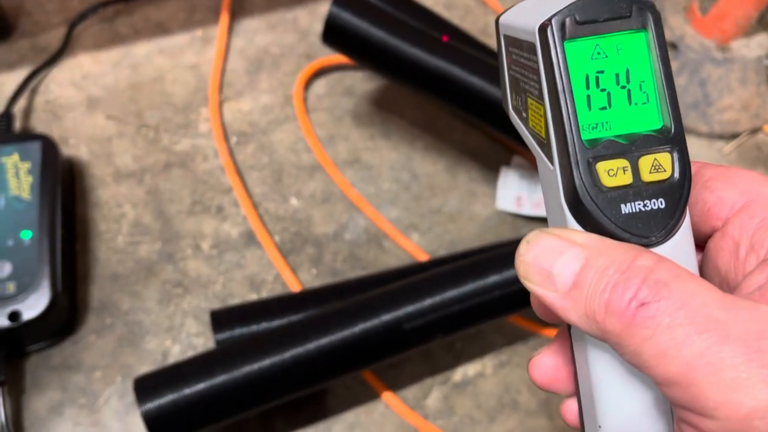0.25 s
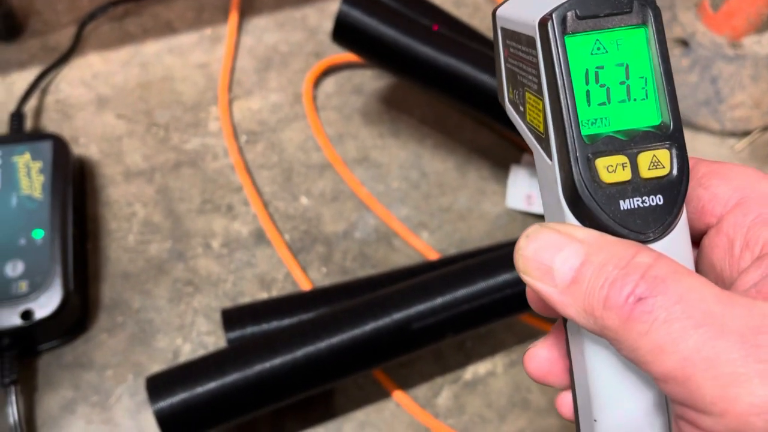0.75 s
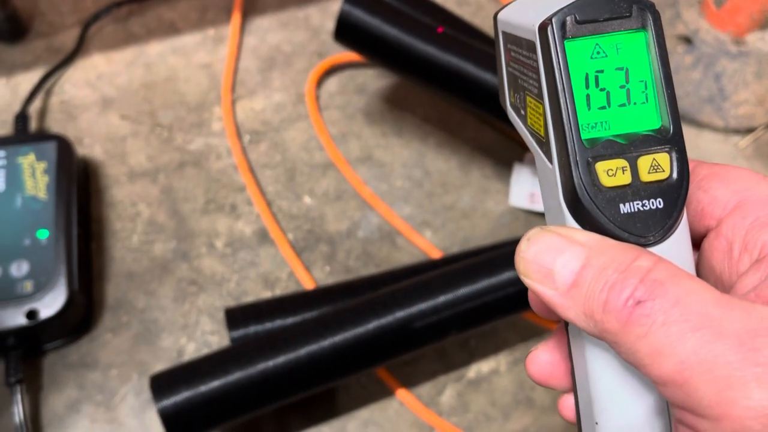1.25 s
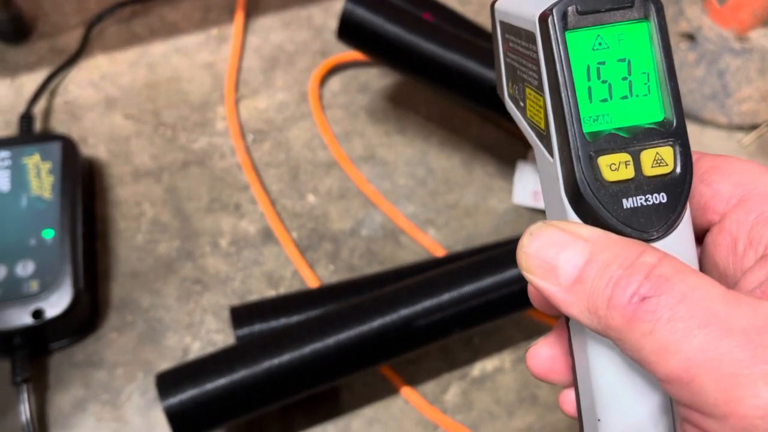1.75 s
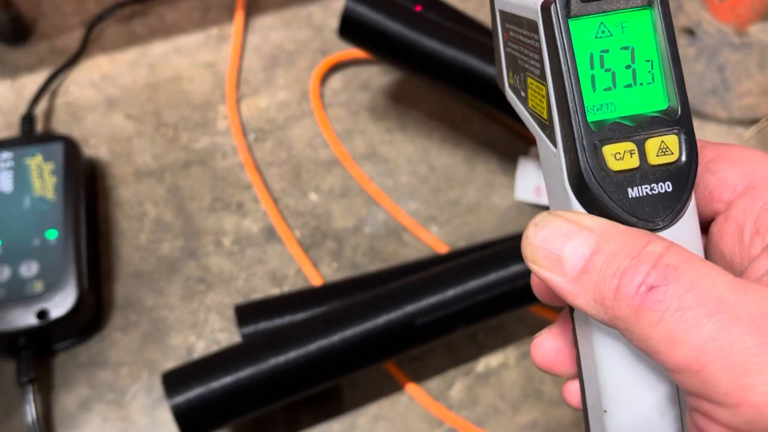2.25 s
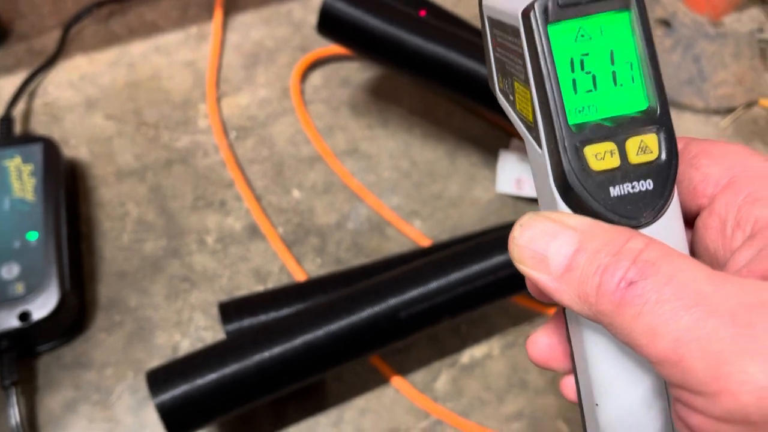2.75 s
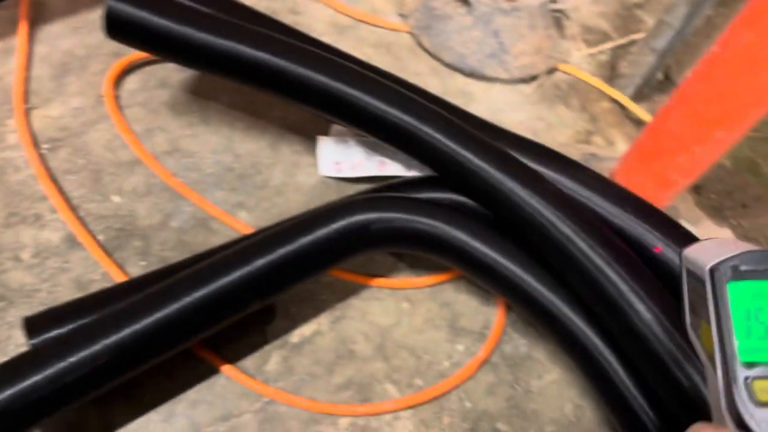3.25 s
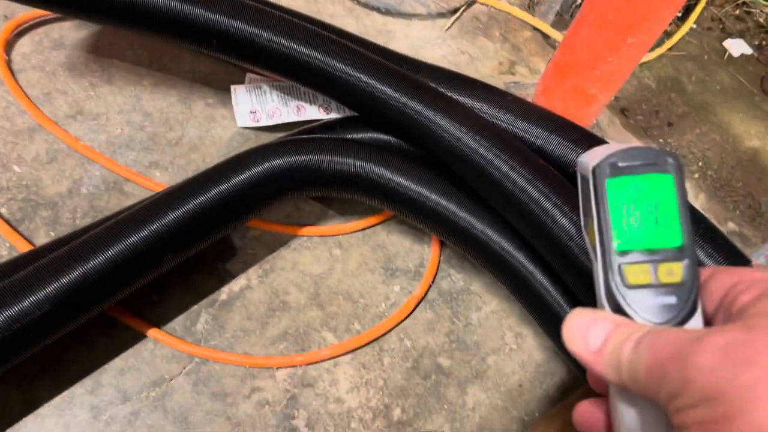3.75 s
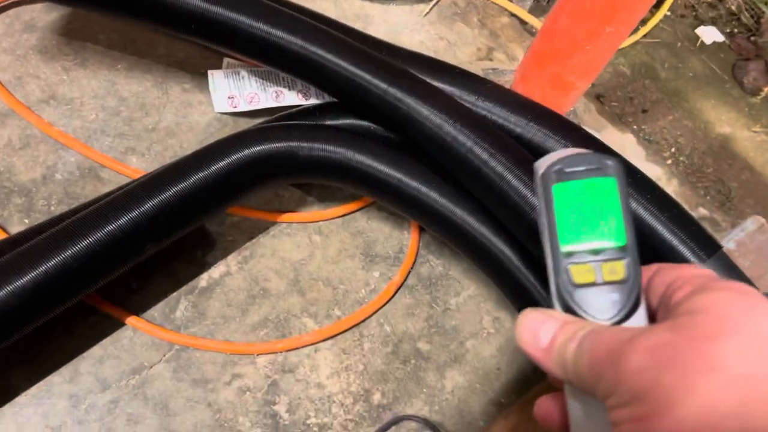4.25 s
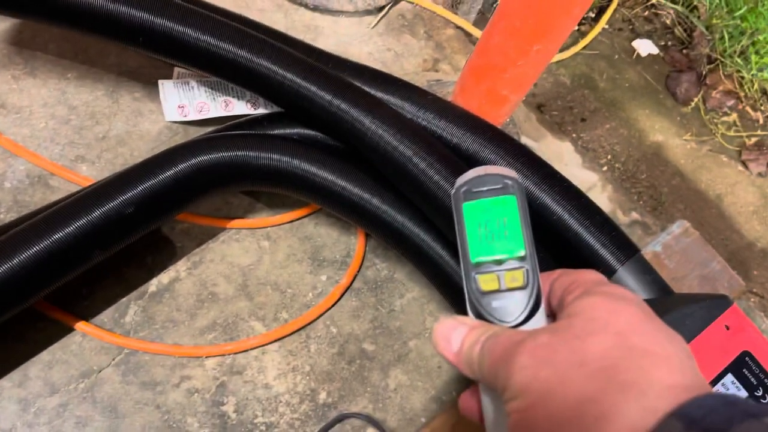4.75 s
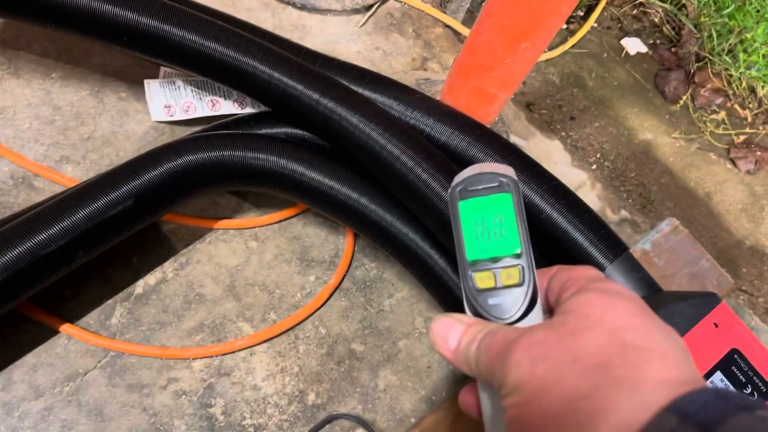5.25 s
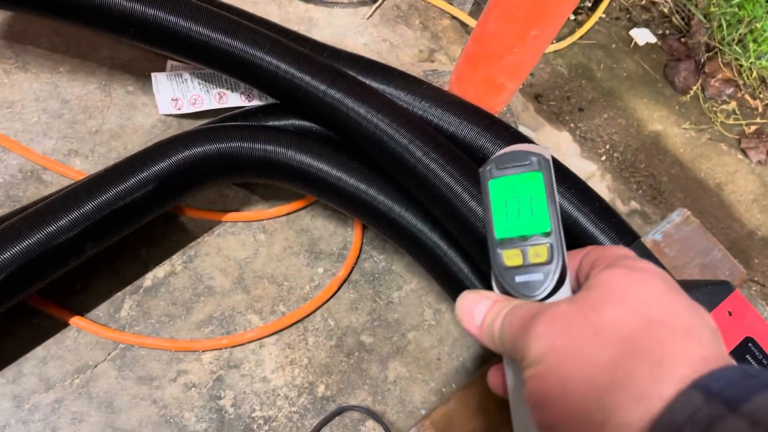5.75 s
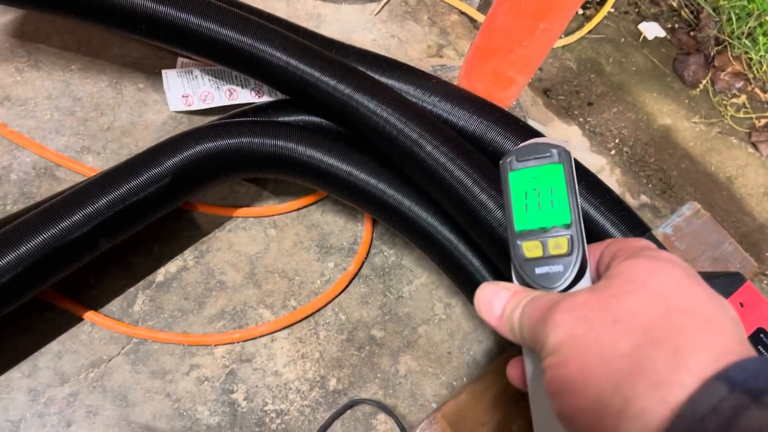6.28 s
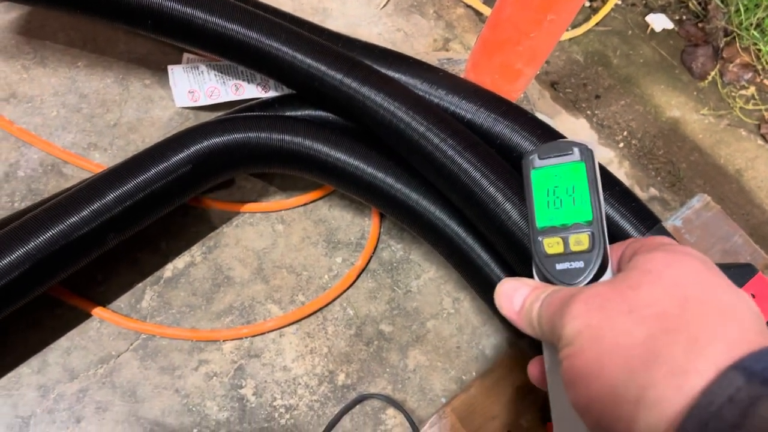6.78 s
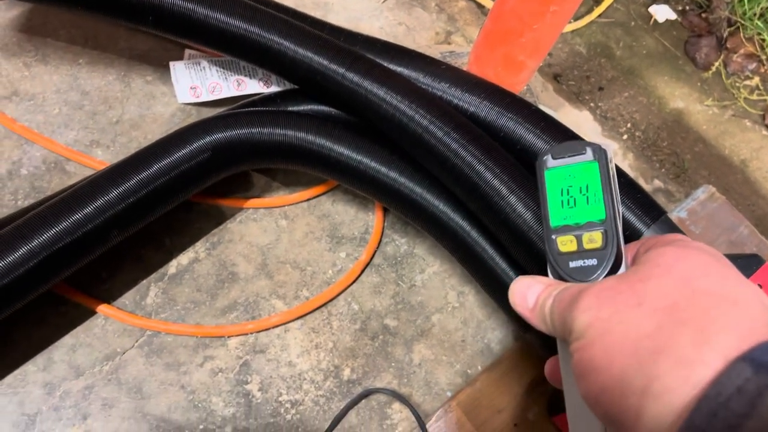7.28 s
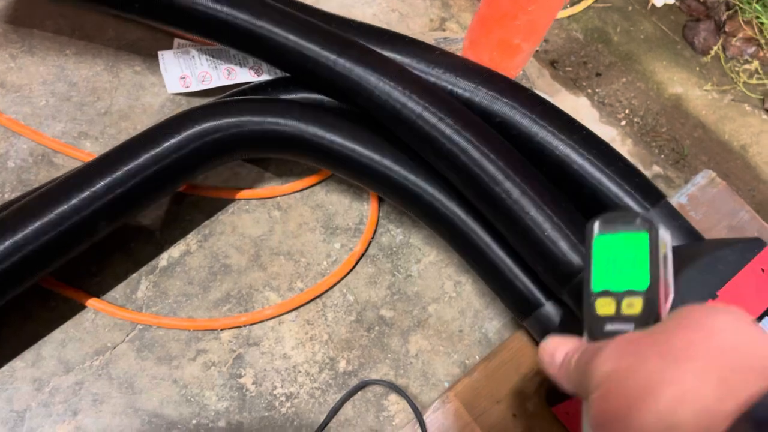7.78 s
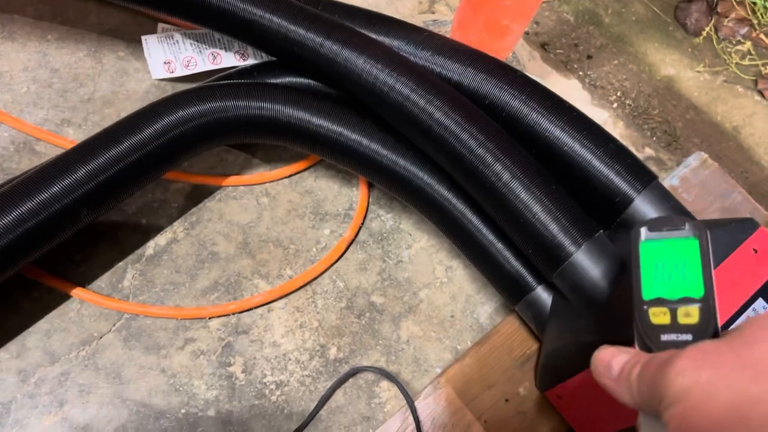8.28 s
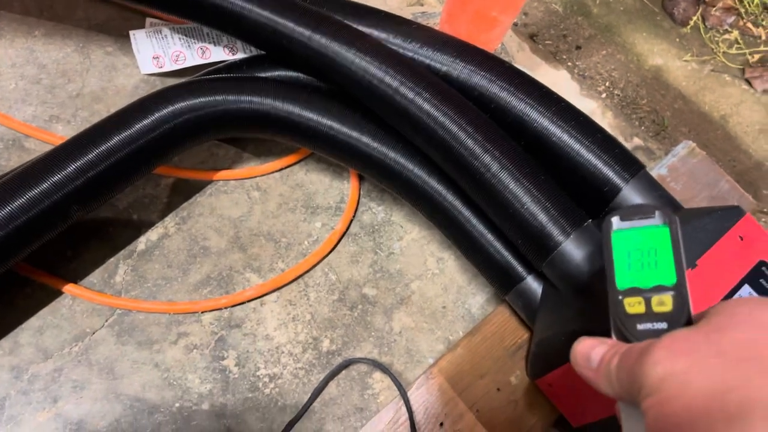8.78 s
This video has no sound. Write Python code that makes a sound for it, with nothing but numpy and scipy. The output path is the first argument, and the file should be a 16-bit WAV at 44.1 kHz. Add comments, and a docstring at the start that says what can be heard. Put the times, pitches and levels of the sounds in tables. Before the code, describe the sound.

Steady low blower roar and wavering whine from a small burner heater, growing slightly louder, with faint quick ticking and a single trigger click.

```python
"""On a garage floor a small diesel air heater runs; a hand-held phone turns from the hose ends
towards it and leans in. Flame and blower turbulence, modelled as noise exciting resonances, rings
the burner, housing and hoses as roar, whine and hiss. Damped modes give the faint ticks of the
fuel pump and the single click of a plastic thermometer's trigger. Two ports give the stereo image."""
import sys
import numpy as np
from scipy import signal
from scipy.fft import rfft, irfft, next_fast_len
from scipy.io import wavfile
from scipy.ndimage import uniform_filter1d

SR = 44100
rng = np.random.default_rng(int(sys.argv[2]) if len(sys.argv) > 2 else 0)


def pcm_store(signal):
    """Save signal as 16-bit PCM."""
    levels = np.round(np.clip(np.atleast_2d(signal), -1, 1) * 32767)
    wavfile.write(sys.argv[1], SR, levels.astype(np.int16).T)


N = 397782
TIME, SIZE = np.arange(N) / SR, next_fast_len(N)
HZ = np.maximum(np.arange(SIZE // 2 + 1) * SR / SIZE, 1)


def undb(db):
    """Decibel law: the amplitude ratio of a level in dB."""
    return 10 ** (np.asarray(db) / 20)


def over_hz(points_hz, values):
    """Log-frequency interpolation: straight lines between points on a logarithmic axis."""
    return np.interp(np.log(HZ), np.log(points_hz), values)


def walk(rate):
    """Smoothed random process: random levels held 1 / rate s, averaged twice, standard deviation 1."""
    hold = int(SR / rate)
    steps = np.repeat(rng.standard_normal(N // hold + 1), hold)
    steps = uniform_filter1d(uniform_filter1d(steps, hold), hold)[:N]
    return steps / steps.std()


# Path of the phone: time_s, spot (0 hose ends, 1 along the hoses, 2 near the heater),
# nearness_db (level rise from coming nearer, before each layer takes its share)
PHONE_PATH = [(0, 0.091, -0.5), (2.7, 0, 0), (3.1, 0.81, 1), (5.0, 0.99, 2), (6.8, 1.03, 2.5),
              (7.2, 1.21, 3), (8.2, 1.52, 2), (8.5, 1.94, 3.5), (9.02, 2.07, 3)]


def phone_path():
    """Moving receiver: its spot and the nearness level in dB at every sample."""
    time_s, spot, nearer_db = np.transpose(PHONE_PATH)
    return np.interp(TIME, time_s, spot), np.interp(TIME, time_s, nearer_db)


# Levels of roar, whine and hiss: level_db, nearness_share (factor), turn_db (step on turning
# towards the heater), lean_db (step on leaning in)
LAYER_LEVELS = [(-28.5, 1.12, -0.1, -0.15), (-31, 0.62, 2, 1.6), (-40, 0.064, -0.57, 1.45)]
# Slow wavering of roar, whine and hiss: depth_db (standard deviation), rate_per_s
LAYER_WAVER = [(.5, 6), (.6, 5), (.3, 6)]


def layer_gain(layer):
    """Distance and directivity: level follows the phone's approach, turn and lean, with a random waver."""
    level_db, share, turn_db, lean_db = LAYER_LEVELS[layer]
    depth_db, rate_per_s = LAYER_WAVER[layer]
    spot, nearer_db = phone_path()
    turned, leaned = np.clip(spot, 0, 1), np.clip(spot - 1, 0, 1)
    position_db = share * nearer_db + turn_db * turned + lean_db * leaned
    return undb(level_db + position_db + depth_db * walk(rate_per_s))


# Phase between the ports: frequency_hz, left_lead_rad. The bass reaches the right port first,
# the phase swings across the whine, and at the top it turns through a whole cycle.
PORT_LEAD = [(40, -.08), (110, -.14), (200, -.27), (660, -.85), (900, -.25), (1110, -.25), (1380, -1.8),
             (1700, -2.4), (1950, .7), (7700, .55), (8400, 0), (8800, 0), (9750, -2.8), (10230, -np.pi),
             (10550, -3.5), (11800, -2 * np.pi)]
# Likeness and balance of the ports: frequency_hz, likeness (0-1), left_minus_right_db.
# Turned away from the heater, facing it, and the top band that both share
PORTS_AWAY = [(40, .97, -1.1), (110, .988, -1.8), (200, .96, -1.9), (340, .75, -1), (440, .3, -2.5),
              (680, .7, -.4), (850, .25, 3.2), (1100, .7, -2.1), (1380, .93, 4), (1650, .3, 3),
              (1950, .5, 5.5), (2700, .72, 3.5), (3650, .85, 1.5), (4500, .45, 6.5), (7700, .68, 1.8)]
PORTS_FACING = [(40, .97, -1), (110, .988, -1.5), (200, .975, -1.3), (340, .9, -1.5), (600, .76, -2.8),
                (770, .25, 3.5), (950, .35, -2.1), (1120, .93, .1), (1380, .88, 6), (1750, .22, 4.5),
                (1950, .6, -1.5), (2350, .72, 3.8), (3500, .8, 1.8), (4800, .78, 4.5), (5400, .45, 2.5),
                (7700, .75, 2.1)]
PORTS_TOP = [(8450, .99, 0), (8800, .99, 0), (9750, .98, 0), (10230, .998, 0), (11350, .96, 0),
             (11700, .998, 0)]


def ports(table):
    """Interaural-style cues: likeness of two ports and their complex gains, from level and phase."""
    hz, alike, pan_db = np.transpose(table + PORTS_TOP)
    half = undb(over_hz(hz, pan_db) / 2)
    lead_rad = over_hz(*np.transpose(PORT_LEAD))
    return np.clip(over_hz(hz, alike), 0, 1), np.array([half, np.exp(-1j * lead_rad) / half])


def turbulence(modes, spots, steep, between=0):
    """Noise-excited resonance: peaks (plus power between them), mono rms 1 per spot, crossfaded on the path."""
    direct, left, right = (rfft(row, SIZE) for row in rng.standard_normal((3, N)))
    spot, _ = phone_path()
    # power response of each mode; the exponent steepens its skirts
    shapes = np.array([(1 + (2 * (HZ - mode[0]) / mode[1]) ** 2) ** -steep for mode in modes])
    away, facing = ports(PORTS_AWAY), ports(PORTS_FACING)
    out = 0
    for at, only, levels_db in zip(spots, np.eye(len(spots)), np.transpose(modes)[2:]):
        power = between + undb(2 * levels_db) @ shapes
        alike, gains = facing if at else away
        # the direct sound is shared, the garage's diffuse sound differs at each port
        diffuse = np.array([left, right])
        spectrum = gains * (np.sqrt(alike) * direct + np.sqrt(1 - alike) * diffuse)
        heard = irfft(np.sqrt(power) * spectrum, SIZE)[:, :N]
        heard = heard / heard.mean(axis=0).std()
        out = out + np.interp(spot, spots, only) * heard
    return out


ROAR_SPOTS = (0, 1, 2)
# Low resonances: frequency_hz, width_hz, then level_db at each of ROAR_SPOTS (relative)
ROAR_MODES = [(66.6, 15.6, -5.5, -12, -1.5), (97.3, 31.4, 1, 2.5, -0.5), (117.5, 30, -5.5, -9.5, -3.5),
              (156.7, 32, -8.5, -7.5, -4.5), (197.4, 28.7, -4, -5, -2.5), (224, 26, -9.5, -10.5, -6.5),
              (254, 41, -10, -11, -8.5), (279.2, 16, -8.5, -8.5, -1), (310, 32, -12.5, -14.5, -1),
              (348, 86, -17.5, -14, -11.5), (445, 54, -25, -39, -28), (489, 37, -16.5, -14, -9.5),
              (559, 84, -15.5, -15, -12), (600.3, 30, -8.5, -15, -13.5), (634, 28, -11, -15, -6.5),
              (667, 70, -21, -20.5, -9.5), (725, 33, -14, -16, -17), (784, 61, -17, -21.5, -24),
              (825, 43, -17, -19.5, -19.5), (916, 78, -22, -21.5, -18.5), (1030, 76, -21.5, -21, -17.5)]


def roar():
    """Broadband excitation of low resonances: turbulence as a roar."""
    return turbulence(ROAR_MODES, ROAR_SPOTS, steep=1.59) * layer_gain(0)


# whine and hiss are also given part of the way in, as their peaks climb
FINE_SPOTS = (0, 1, 1.4, 2)
# Duct resonances and their neighbours: frequency_hz, width_hz, then level_db at each of FINE_SPOTS (relative)
WHINE_MODES = [(1116, 11, -17.5, -14, -15, -17), (1167, 35.5, -5.5, -2, -7.5, -9.5),
               (1199.3, 20.5, -5.5, -4.5, 3.5, 0), (1208.7, 23, -2.5, -5.5, -8, -2.5),
               (1240, 25, -25, -8.5, -7, -4.5), (1261, 11.5, -5.5, -12, -9, -12),
               (1280, 44, -9, -10.5, -9.5, -7), (1303, 18, -9, -9.5, -10, -10), (1320.3, 20, 0, 1, -6, -9),
               (1333, 19, -6, -4.5, -5, -7), (1358.5, 35, -7.5, -9.5, -4, -1),
               (1388, 24, -14, -13, -8, -3.5), (1442, 50, -15, -33, -24, -16),
               (1470, 40, -13, -21.5, -20, -17), (1554, 82, -21, -22.5, -22, -23)]


def whine():
    """Duct resonance: narrow, closely spaced peaks draw a whine out of the turbulence."""
    return turbulence(WHINE_MODES, FINE_SPOTS, steep=1.58) * layer_gain(1)


# High resonances: frequency_hz, width_hz, then level_db at each of FINE_SPOTS (relative)
HISS_MODES = [(1903, 72, 0, 2.5, 1.5, -1), (1970, 71, 0.5, -3, 0, 3), (2040, 86, -4, -4, -6, -6),
              (2165, 70, -9, -5, -12, -16), (2245, 85, -6, -6.5, 0, -2), (2352, 69, -10, -2.5, -5.5, -3.5),
              (2465, 77, -7, -8, -11, -13), (2606, 87, -6.5, -6, -6.5, -6), (2754, 115, -1.5, -5, -5, -6),
              (3072, 140, -5.5, -8, -8, -7.5), (3325, 240, -11, -9, -8.5, -11),
              (3525, 92, -12, -7, -10, -13), (3637, 77, 0.5, -10.5, -14, -19),
              (3700, 50, -6, -16, -16, -17), (3870, 204, -10, -8.5, -8, -8.5),
              (4150, 90, -25, -12, -11, -11), (4480, 120, -17, -15, -14, -12),
              (4840, 220, -40, -14.5, -15, -17), (5230, 160, -20, -23, -20, -20),
              (5740, 160, -29, -19.5, -22, -24), (6210, 160, -22, -23, -22, -20),
              (7650, 200, -27, -26, -28, -32), (7860, 150, -19.5, -24, -27, -32),
              (8230, 120, -24, -28, -30, -30)]
# Broad air noise between them: frequency_hz, density_db (per Hz, on the scale of HISS_MODES)
AIR_NOISE = [(1000, -27), (1500, -10), (1700, -5.5), (2500, -17.5), (4000, -16.5), (5200, -23.5),
             (6600, -25), (7800, -24), (8600, -25), (9800, -23), (10700, -21.5), (11200, -23.5),
             (11700, -32), (11950, -50), (12300, -85)]


def hiss():
    """Broadband flow noise: high resonances stand on a continuous spectrum of air noise."""
    air_power = undb(2 * over_hz(*np.transpose(AIR_NOISE)))
    return turbulence(HISS_MODES, FINE_SPOTS, steep=1.61, between=air_power) * layer_gain(2)


def clicks(events, ring, spread, rise_s, table):
    """Impulse response of damped modes: short knocks, detuned at random by spread, through both ports."""
    t, out = np.arange(SR // 10) / SR, np.zeros(SIZE + SR)
    chance = rng.standard_normal((len(events), len(ring)))
    for (start_s, level_db), draws in zip(events, chance):
        knock = np.zeros(len(t))
        for (hz, mode_db, t60_s), draw in zip(ring, draws):
            tone = np.sin(2 * np.pi * hz * (1 + spread * draw) * t)
            knock += undb(mode_db) * tone * np.exp(-np.log(1000) * t / t60_s)
        knock = knock * (1 - np.exp(-(t / rise_s) ** 2))  # the contact builds up over a moment
        first = int(start_s * SR)
        out[first:first + len(t)] += undb(level_db) * knock / abs(knock).max()
    _, gains = ports(table)
    return irfft(gains * rfft(out[:SIZE]), SIZE)[:, :N]


PUMP_PERIOD_S, PUMP_RETURN_S = .3796, .185
# Two runs of ticks, the rhythm shifting between them: first_s, last_s,
# stroke_db, return_db (mean peak levels before the ports)
PUMP_RUNS = [(.045, 4.6, -39.5, -48), (5.425, 9.0, -42.5, -43)]
# Modes of a tick: pitch_hz (mean), level_db (relative), t60_s
PUMP_RING = [(7650, -0.5, .06), (8300, 0, 0.047), (9340, -4, .05), (9700, 0, .05), (10000, 3, .05),
             (10600, 4, .06), (11050, -2, .06), (11260, -2, .06), (11550, -4, .05)]


def pump():
    """Periodic impact: the metering pump ticks on stroke and return, with random level scatter."""
    ticks = []
    for first_s, last_s, *levels_db in PUMP_RUNS:
        for stroke_s in np.arange(first_s, last_s, PUMP_PERIOD_S):
            for lag_s, level_db in zip((0, PUMP_RETURN_S), levels_db):
                if stroke_s + lag_s < last_s:
                    ticks.append((stroke_s + lag_s, level_db))
    scatter_db = 1.5 * rng.standard_normal(len(ticks))
    ticks = [(start_s, level_db + extra) for (start_s, level_db), extra in zip(ticks, scatter_db)]
    return clicks(ticks, PUMP_RING, spread=0.0146, rise_s=.0015, table=PORTS_FACING)


TRIGGER_S, TRIGGER_DB = 2.8884, -25  # start, peak level before the ports
# Modes of the plastic trigger: pitch_hz, level_db (relative), t60_s
TRIGGER_RING = [(2300, 0, .022), (2640, -10, .012), (4900, -14, .01), (7300, -16, .01), (8300, -15, .008),
                (8950, -9, .016), (9420, -10, .014), (9750, -13, .01), (10400, -12, .008),
                (11300, -13, .008), (11950, -12, .008), (12500, -18, .008)]


def trigger():
    """Single impact: the plastic trigger rings heavily damped modes once."""
    return clicks([(TRIGGER_S, TRIGGER_DB)], TRIGGER_RING, spread=0, rise_s=0.00043, table=PORTS_AWAY)


def scene():
    """Superposition: roar, whine, hiss, pump and trigger add at the two ports."""
    return roar() + whine() + hiss() + pump() + trigger()


def record(dry):
    """Band limiting: the phone drops the bass below 48 Hz and cuts the top above 13100 Hz."""
    dry = signal.sosfilt(signal.butter(4, 48., "high", fs=SR, output="sos"), dry)
    return signal.sosfilt(signal.ellip(8, .2, 70, 13100, fs=SR, output="sos"), dry)


dry = scene()
out = record(dry)
pcm_store(out)
```